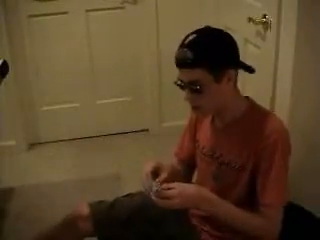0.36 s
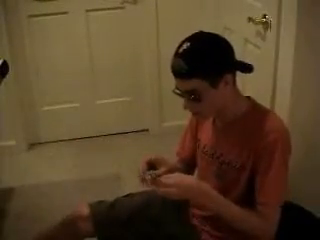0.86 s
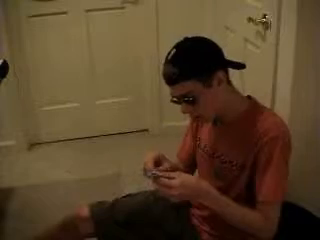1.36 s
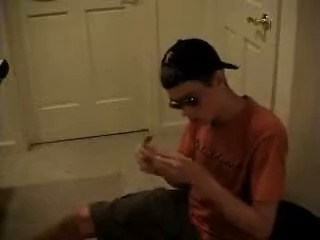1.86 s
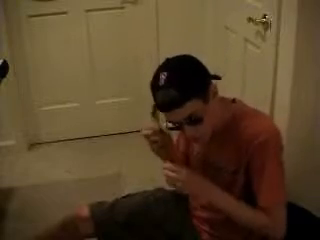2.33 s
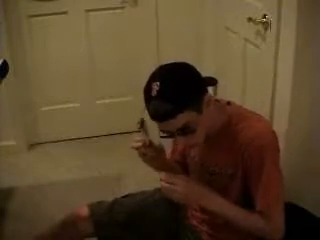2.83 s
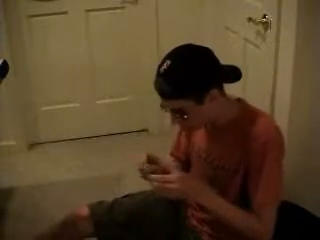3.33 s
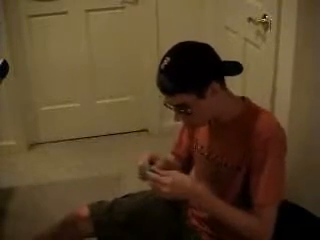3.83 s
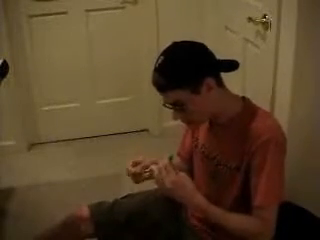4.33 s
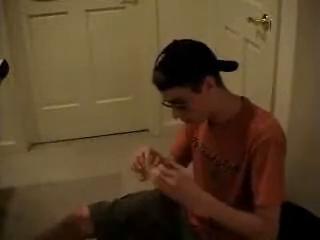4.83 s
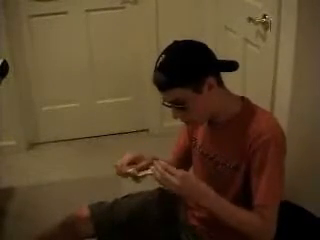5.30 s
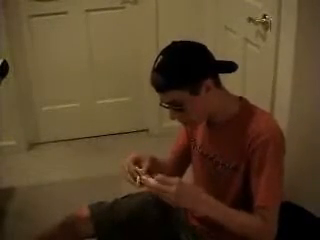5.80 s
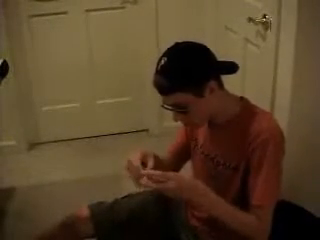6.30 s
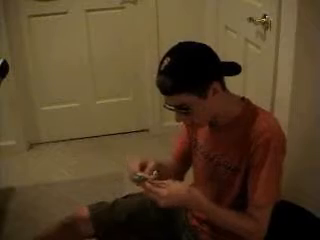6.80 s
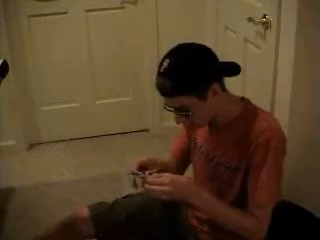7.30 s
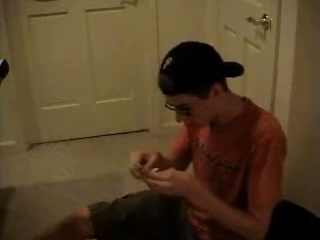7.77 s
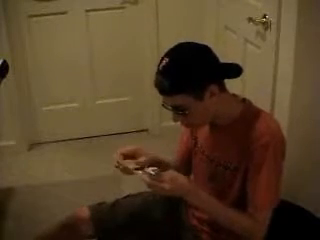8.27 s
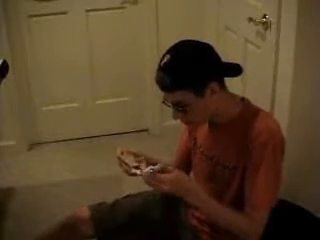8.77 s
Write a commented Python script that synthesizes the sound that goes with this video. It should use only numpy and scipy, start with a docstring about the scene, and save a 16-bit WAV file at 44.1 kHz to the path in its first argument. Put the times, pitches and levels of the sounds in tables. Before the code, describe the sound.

Stiff wrapping paper crinkles and snaps in fidgeting hands, tears in short rips, then gives one very loud crack in a quiet carpeted room.

```python
"""A small parcel worked open by hand

Hands work stiff wrapping in a quiet carpeted room, two metres from a pair of microphones.
Creases buckle with short snaps of filtered noise; rustle and dense rips are trains of damped sines.
Sparse decaying taps give the room its reverberation, and one hard pull overloads the input.
Shaped noise underneath makes a low hum, microphone hiss and one brief rumble."""
import sys
import numpy as np
from scipy import signal
from scipy.fft import rfft, irfft, next_fast_len
from scipy.io import wavfile
from scipy.ndimage import uniform_filter1d

SR = 44100
rng = np.random.default_rng(int(sys.argv[2]) if len(sys.argv) > 2 else 0)


def attenuation_scalar(level_db):
    """Turn a level in dB into a linear amplitude multiplier (20 dB per decade)."""
    decades = np.asarray(level_db, float) / 20
    return 10 ** decades


def wav_record(signal):
    """Record a signal, one row per channel, as 16-bit PCM in the file named by sys.argv[1]."""
    frames = np.transpose(np.atleast_2d(signal))
    bounded = np.clip(frames, -1, 1)
    # unit amplitude maps onto the largest positive 16-bit level
    quanta = np.round(bounded * 32767).astype(np.int16)
    wavfile.write(sys.argv[1], SR, quanta)


N = 392049  # length in samples


def evened(x):
    """Normalises the mean power: scales to rms 1."""
    return x / np.sqrt(np.mean(x ** 2) + 1e-20)


def read(points, hz):
    """Interpolates a spectrum table on a log-frequency axis."""
    f, value = np.transpose(points)
    return np.interp(np.log(hz + 1), np.log(f + 1), value)


def coloured(x, points):
    """Zero-phase filtering: multiplies the spectrum by real gains from a dB table."""
    size = next_fast_len(x.shape[-1])
    gains = attenuation_scalar(read(points, np.fft.rfftfreq(size, 1 / SR)))
    return irfft(rfft(x, size) * gains, size)[..., :x.shape[-1]]


def band(x, lo_hz, hi_hz):
    """Causal resonance: a Butterworth band-pass."""
    return signal.sosfilt(signal.butter(2, [lo_hz, hi_hz], "band", fs=SR, output="sos"), x)


def add(mix, s, sound):
    """Superposition: adds a sound to the mix, in place, from a time in seconds."""
    part = mix[round(s * SR):][:len(sound)]
    part += sound[:len(part)]


def hush():
    """Partly coherent noise: room air and microphone hiss on two sides, with two narrow hums."""
    # relative spectrum of the hiss: f/Hz, level per Hz/dB
    hiss_spectrum = [(15, -34.5), (25, -14.5), (109, -5.5), (160, -7.5), (224, -6.5), (380, -4),
                     (545, -4.5), (630, -1), (1570, -12), (1730, -13), (2740, -15.5), (5500, -20.5),
                     (7350, -26.5), (7900, -58), (10300, -68.5), (17400, -120)]
    # left-right correlation of the hiss: f/Hz, coefficient (-1 to 1)
    coherence = [(60, 0.11), (160, 0.14), (410, -0.41), (1080, -0.54), (2840, -0.042), (7450, -0.43)]
    # wavering hum tones: f/Hz, width/Hz, level/dB
    hums = [(208.7, 13.5, -60), (243.8, 8.6, -61)]
    hiss_db = -48  # rms
    frames, hz = N // 512 + 5, np.fft.rfftfreq(2048, 1 / SR)
    a, b, c, d = rng.standard_normal((4, len(hz), frames))
    same = np.clip(read(coherence, hz), -1, 1)[:, None]
    left = a + 1j * b
    right = same * left + np.sqrt(1 - same ** 2) * (c + 1j * d)
    spectra = np.array([left, right]) * attenuation_scalar(read(hiss_spectrum, hz))[:, None]
    hiss = signal.istft(spectra, nperseg=2048, noverlap=1536)[1][:, :N]
    out = attenuation_scalar(hiss_db) * evened(hiss)
    for tone_hz, width_hz, db in hums:
        noise = rng.standard_normal((2, N))
        out += attenuation_scalar(db) * evened(band(noise, tone_hz - width_hz / 2, tone_hz + width_hz / 2))
    return out


def rumble():
    """Band-limited noise under an envelope: low noise swells, holds and fades once."""
    start_s, rise_s, hold_s, fade_s = 2.16, .05, .29, .12
    corners = start_s + np.cumsum([0, rise_s, hold_s, fade_s])
    level = attenuation_scalar(-60) * np.interp(np.arange(N) / SR, corners, [0, 1, 1, 0])
    return level * evened(band(rng.standard_normal(N), 22, 80))


def room(x):
    """Impulse-response convolution: direct sound, near echoes and sparse taps decaying band by band."""
    # reverberation time: f/Hz, t60/s
    decay = [(300, 0.58), (1000, 0.31), (2500, .35), (5000, 0.33), (8000, 0.3)]
    # reflections from floor, knees and door: delay t/s, left level/dB, right level/dB
    reflections = [(.0045, -14.5, -19), (.0075, -29.5, -15.5), (.011, -26, -23.5), (.016, -15.5, -24)]
    tail_db = -8  # energy of the left reverberant tail relative to the direct sound
    tail_same = 0.39  # left-right likeness of the tail
    taps = np.zeros((2, SR // 2))
    at = np.arange(500, SR // 2 - 20, 20) + rng.integers(0, 20, (2, (SR // 2 - 501) // 20))
    np.put_along_axis(taps, at, rng.choice([-1., 1.], at.shape), 1)
    taps[1] = tail_same * taps[0] + np.sqrt(1 - tail_same ** 2) * taps[1]
    hz, t, z = signal.stft(taps, SR, nperseg=256)
    decayed = z * attenuation_scalar(-60 * t / read(decay, hz)[:, None])
    response = signal.istft(decayed, SR, nperseg=256)[1]
    response *= attenuation_scalar(tail_db) / np.linalg.norm(response[0])
    response[:, 0] += 1  # direct sound
    for s, *side_db in reflections:
        response[:, round(s * SR)] += attenuation_scalar(side_db)
    return signal.oaconvolve(x[None], response, axes=1)[:, :N]


def thumps():
    """Pressure pulse: one slow push and pull of air, alike at both ports."""
    # air pushed as the sheet gives: t/s, scale level/dB (the pulse itself peaks 4.7 dB lower)
    pushes = [(4.451, -35), (5.206, -39), (8.32, -18)]
    out, u = np.zeros(N), np.arange(6000) / SR / .0045
    pulse = (1 - u) * np.exp(-u) * np.minimum(u * 4, 1)
    for s, db in pushes:
        add(out, s, attenuation_scalar(db) * pulse)
    return out


def effort(gestures, resting):
    """Incoherent addition: gestures swell and fade, powers add, and the brightness is the power-weighted mean
    of all gestures and the resting level."""
    resting_bright = .6
    t = np.arange(0, N, 32) / SR
    s, db, swell_s, fade_s, bright = np.transpose(gestures)[..., None]
    power = attenuation_scalar(db - 20 * np.where(t < s, (s - t) / swell_s, (t - s) / fade_s)) ** 2
    rest = resting(t) ** 2 + 1e-20
    total = power.sum(0) + rest
    share = ((power * bright).sum(0) + rest * resting_bright) / total
    return [np.interp(np.arange(N) / SR, t, v) for v in (np.sqrt(total), np.clip(share, 0, 1))]


def crackle(level, bright, per_s, spread_db, cycles, clump_db):
    """Shot noise through resonators: clumped tiny buckles each ring their own patch of paper."""
    # relative spectrum of the loose sheet: f/Hz, level per Hz/dB
    slack_sheet = [(150, -17), (300, -13), (700, -8), (1500, 1.5), (2400, -4.5), (3500, -13), (6000, -7),
                   (7900, -6), (10000, -47)]
    # relative spectrum of the stretched sheet: f/Hz, level per Hz/dB
    taut_sheet = [(150, -33.5), (500, -16.5), (1000, -3), (2400, 0.5), (3400, 0.5), (4600, 0.5),
                  (6500, -10.5), (7900, -20.5), (10000, -45)]
    clumps = attenuation_scalar(clump_db * evened(uniform_filter1d(rng.standard_normal(N), size=400)))
    size = attenuation_scalar(spread_db * np.minimum(rng.exponential(1, N), 4)) * rng.choice([-1., 1.], N)
    size *= clumps * (rng.random(N) < per_s / SR)
    patch, grains = rng.integers(0, 24, N), np.zeros(N)
    for k, hz in enumerate(np.geomspace(250, 9000, num=24)):
        # a damped sine that falls by 1/e in the given cycles; equal energy per Hz across patches
        r, turn = np.exp(-hz / cycles / SR), 2 * np.pi * hz / SR
        feedback = [1, -2 * r * np.cos(turn), r * r]
        grains += signal.lfilter([hz * r * np.sin(turn)], feedback, size * (patch == k))
    slack = evened(coloured(grains, slack_sheet))
    taut = evened(coloured(grains, taut_sheet))
    return level * ((1 - bright) * slack + bright * taut)


def rustle():
    """Sparse shot noise: squeezed paper crackles, and fingers never quite rest."""
    # squeezes of the sheet: peak t/s, level/dB, 20 dB swell t/s, 20 dB fade t/s, brightness (0-1)
    squeezes = [(.239, -52, .06, .2, .6), (.341, -52, .2, .16, .6), (.521, -47, .09, .15, .95),
                (.718, -49, .04, .11, .6), (.994, -46.5, .09, .18, .8), (1.275, -50, .07, .05, .6),
                (1.42, -56, .02, .3, .7), (1.527, -43.5, .17, .075, .95), (1.956, -48, .01, .35, .7),
                (2.548, -51, .1, .6, .6), (2.728, -53, .4, .05, .4), (3.195, -52.5, .1, .05, .7),
                (3.724, -54, .08, .6, .6), (3.893, -43.5, .04, .2, .95), (4.07, -49, .15, .1, .4),
                (4.128, -38, .02, .07, .2), (4.258, -34, .045, .105, .8), (4.815, -37.5, .06, .04, .6),
                (4.947, -45, .19, .125, .4), (6.2, -41, .15, .11, .6), (6.326, -46.5, .03, .3, .8),
                (6.515, -39.5, .2, .13, .7), (6.71, -44, .17, .3, .45), (6.915, -46, .07, .045, .3),
                (6.99, -48, .025, .14, .6), (7.106, -51, .1, .3, .9), (7.21, -46, .06, .25, .7),
                (7.509, -42.5, .3, .07, .6), (7.689, -41.5, .07, .2, .45), (7.792, -33.5, .025, .035, .6),
                (7.836, -24.5, .011, .022, .8), (8.118, -45, .045, .16, .7), (8.215, -42, .055, .14, .95)]
    # restless fingers: t/s, level/dB
    fidget = [(0, -61), (.9, -63), (1.7, -66), (2.3, -66), (2.9, -59), (3.4, -65), (3.7, -60), (4.4, -57),
              (4.62, -60), (4.72, -50), (5.1, -54), (5.75, -51), (5.9, -53.5), (6.1, -51), (7, -61),
              (7.8, -57), (7.93, -48.5), (8.1, -56), (8.52, -48.5), (8.89, -48)]
    grains_per_s = {"rustle": 3000, "rip": 9000}  # buckles per second, by kind of crackle
    fingers = effort(squeezes, lambda t: attenuation_scalar(np.interp(t, *np.transpose(fidget))))
    return crackle(*fingers, grains_per_s["rustle"], spread_db=1.5, cycles=0.71, clump_db=2.5)


def rips():
    """Dense shot noise: fibres part in quick succession along a tear."""
    # tugs: peak t/s, level/dB, 20 dB swell t/s, 20 dB fade t/s, brightness (0-1)
    tugs = [(4.44, -30, .02, .05, .8), (4.458, -18.5, .025, .083, .6), (4.546, -47, .05, .11, .65),
            (5.166, -32.5, .02, .15, .6), (5.207, -19.5, .011, .04, .65), (5.265, -31, .04, .25, .55),
            (5.368, -27.5, .03, .055, .85), (5.41, -35, .03, .2, .7), (5.495, -24.5, .035, .12, .65),
            (5.538, -23, .07, .065, .9), (5.595, -32, .08, .03, .9), (8.284, -27, .006, .1, .75),
            (8.328, -9.5, .035, .06, .35), (8.348, -16, .03, .078, .45)]
    return crackle(*effort(tugs, np.zeros_like), 9000, spread_db=2.0, cycles=1.97, clump_db=1.9)


def snaps():
    """Buckling instability: a crease flips with a wide click, its patch rings, fine crackle follows."""
    # creases: t/s, peak level of the click/dB, ring f/Hz, energy share of the sharp edge/dB,
    # after-crackle level relative to the peak/dB
    creases = [(0.2352, -38.3, 1550, -12.5, -13.2), (0.3416, -34.9, 1700, -7.3, -17.8),
               (0.4835, -37.2, 2970, -4.0, -15.9), (0.5045, -38.0, 3070, -3.1, -30.0),
               (0.512, -35.3, 5090, -2.1, -5.2), (0.5198, -27.9, 1080, -13.2, -19.6),
               (0.5559, -20.9, 1280, -4.7, -21.3), (0.5634, -23.0, 900, -14, -26.5),
               (0.6308, -31.8, 4170, -1.5, -21.8), (0.7071, -23.7, 2250, -7.0, -22.8),
               (0.9789, -32.3, 1750, -11.2, -19.2), (1.267, -39.7, 1290, -18.4, -16.9),
               (1.4071, -42.0, 1400, -6.9, -8.1), (1.4737, -39.7, 1980, -0.7, -30.0),
               (1.5173, -31.4, 3340, -1.6, -12.5), (1.5241, -24.9, 2290, -2.9, -26.0),
               (1.7491, -37.0, 750, -3.8, -17.1), (1.9543, -25.7, 3990, -2.7, -13.0),
               (1.965, -23.0, 2000, -8.3, -27.6), (2.3849, -24.7, 1900, -26, -24.4),
               (2.4593, -32.2, 2260, -15.9, -21.8), (2.4798, -38.4, 2200, -15.8, -29.6),
               (2.51, -28.9, 2170, -16.0, -26.2), (2.5412, -16.6, 2250, -5.1, -27.0),
               (2.5872, -33.5, 1960, -5.6, -21.1), (2.6362, -28.0, 2250, -22.0, -24.0),
               (2.6413, -23.4, 2230, -18, -23.6), (2.663, -34.0, 1430, -18.6, -17.3),
               (2.676, -29.5, 2290, -16.8, -30.0), (2.8229, -29.8, 1600, -16, -23.9),
               (3.1893, -28.7, 2240, -22, -30), (3.3243, -32.7, 2240, -14, -24.7),
               (3.7127, -29.3, 2100, -6.1, -24.4), (3.7797, -23.5, 1300, -3.8, -21.0),
               (3.8409, -28.0, 1600, -4.0, -18.6), (3.8645, -27.9, 2940, -6.2, -20.3),
               (3.8866, -19.8, 2580, -8, -22.7), (3.8991, -25.8, 3560, -1.9, -30.0),
               (3.9281, -20.8, 1380, -7.5, -20.1), (3.9621, -26.8, 2680, -4.7, -25.9),
               (4.007, -34.6, 1290, -7.3, -30.0), (4.0308, -26.6, 2500, -3, -21.4),
               (4.0633, -27.3, 1250, -7.8, -18.9), (4.0811, -31.0, 1490, -6.7, -17.3),
               (4.1197, -21.7, 1700, -7, -21.8), (4.2173, -31.9, 2320, -2.8, -15.5),
               (4.2278, -26.2, 4530, -3.1, -27.3), (4.244, -16.6, 4770, -1.3, -22.4),
               (4.2634, -18.4, 4690, -1.3, -15.3), (4.2953, -26.3, 2320, -2.5, -11.4),
               (4.3026, -20.1, 5780, -0.8, -24.6), (4.3097, -24.5, 1680, -4.1, -18.4),
               (4.4359, -16.4, 2010, -6.9, -16.8), (4.4428, -20.8, 2220, -6.8, -30.0),
               (4.4517, -8.4, 6500, -3.3, -30.0), (4.4663, -14.2, 1440, -5.3, -30.0),
               (4.4739, -13.6, 1490, -5.6, -30.0), (4.7874, -32.0, 2710, -6.9, -15.9),
               (4.8141, -21.3, 3400, -6.0, -21.0), (4.8685, -26.1, 2580, -3.9, -18.4),
               (4.9091, -25.8, 1600, -10.7, -21.7), (4.9369, -30.3, 1790, -11.3, -24.7),
               (5.1457, -39.8, 2200, -9.5, -4.6), (5.158, -25.2, 2560, -2.2, -10.0),
               (5.1679, -20.9, 1570, -7.1, -30.0), (5.1817, -19.3, 1700, -3.8, -30.0),
               (5.2022, -11.3, 3370, -2.4, -18.2), (5.2093, -11.4, 3340, -3.9, -30.0),
               (5.2455, -21.0, 2360, -3.9, -30.0), (5.3685, -16.0, 2430, -5.4, -30.0),
               (5.3943, -22.2, 2500, -8.7, -30.0), (5.4762, -23.6, 1260, -4, -27.0),
               (5.4938, -13.1, 1750, -9.4, -30.0), (5.5243, -12.7, 2940, -6.6, -30.0),
               (5.5346, -9.0, 2340, -2.5, -30.0), (5.5626, -16.0, 4900, -2.6, -30.0),
               (5.601, -19.3, 3060, -3.8, -30.0), (5.9377, -31.6, 850, -27, -16.2),
               (5.947, -30.0, 950, -22, -14.4), (5.9788, -29.8, 1810, -4.0, -28.5),
               (6.0168, -25.9, 4490, -2.5, -27.9), (6.039, -32.8, 5360, -2.1, -24.7),
               (6.0518, -30.9, 1800, -17, -18.0), (6.098, -32.1, 2730, -4.5, -30.0),
               (6.1327, -14.5, 4550, -1, -25.6), (6.1409, -21.1, 4670, -0.9, -30.0),
               (6.1788, -29.4, 1530, -7.2, -10.9), (6.185, -21.2, 2490, -10.5, -24.1),
               (6.202, -26.6, 2680, -16.3, -30.0), (6.3073, -30.9, 3430, -4.4, -11.5),
               (6.3183, -26.1, 1690, -16, -12.1), (6.3308, -25.8, 2630, -0.8, -19.0),
               (6.489, -26.5, 4630, -2.3, -17.9), (6.5145, -19.2, 2860, -1.8, -30.0),
               (6.521, -24.3, 2510, -2.5, -30.0), (6.6617, -27.7, 1600, -18.3, -22.2),
               (6.7209, -24.0, 1210, -5.6, -21.0), (6.8896, -27.1, 1700, -16, -21.1),
               (6.9101, -34.2, 750, -15.6, -30.0), (6.9268, -28.6, 1730, -26.3, -30.0),
               (6.9855, -20.2, 6500, -0.6, -30.0), (7.0936, -27.1, 4940, -1.9, -21.8),
               (7.1966, -31.1, 2250, -3.0, -14.6), (7.2161, -29.1, 4670, -1.3, -16.7),
               (7.3329, -36.1, 2110, -1.1, -18.4), (7.3398, -35.9, 2010, -10.2, -30.0),
               (7.3701, -25.9, 1550, -4.9, -23.7), (7.3965, -26.7, 4290, -1.6, -25.8),
               (7.4191, -21.9, 5100, -3, -20.2), (7.5054, -24.3, 2300, -5.0, -21.9),
               (7.6081, -36.3, 1560, -7.3, -12.8), (7.655, -33.0, 1740, -22.8, -30.0),
               (7.6754, -38.3, 2050, -12.2, -7.9), (7.6868, -21.4, 2550, -4.4, -26.2),
               (7.7089, -27.3, 3100, -4.6, -19.9), (7.7321, -22.4, 2260, -3.6, -23.1),
               (7.786, -18.9, 2900, -6.5, -21.2), (7.7932, -29.1, 2580, -13.7, -30.0),
               (7.824, -18.1, 2270, -3.7, -11.2), (7.8306, -15.8, 1600, -5.5, -30.0),
               (7.8779, -19.3, 4940, -2.0, -17.7), (8.1119, -26.4, 2570, -5.9, -30.0),
               (8.1205, -31.7, 2330, -7.9, -30.0), (8.1395, -30.6, 4590, -1.0, -24.2),
               (8.1556, -24.0, 3050, -3.9, -24.6), (8.2044, -22.5, 1660, -9.2, -15.6),
               (8.2154, -26.7, 1180, -23.7, -16.1), (8.2268, -22.1, 4150, -3.4, -23.8),
               (8.2346, -23.2, 2370, -7.6, -19.5), (8.2848, -19.9, 2200, -1.6, -13.0),
               (8.2957, -12.3, 1810, -4.2, -30.0), (8.3077, -12.4, 1920, -6.2, -30.0),
               (8.3146, -9.5, 2130, -5.1, -30.0), (8.3213, 3.0, 1600, -12, -30),
               (8.3378, -4.0, 2550, -9.2, -30.0), (8.3564, -10.4, 3310, -6, -28.0),
               (8.3742, -2.3, 1870, -6.2, -30.0), (8.3826, -9.7, 2270, -4.3, -30.0),
               (8.5044, -31.4, 1670, -12.2, -22.7), (8.5846, -39.1, 1600, -14.7, -9.9),
               (8.6045, -30.7, 3010, -5.2, -20.3), (8.6833, -25.0, 4270, -1.7, -24.4),
               (8.6913, -31.6, 2000, -18.2, -30.0)]
    flap_hz, middle_hz = 1150, 2300
    paler_db_per_octave, palest_db = 9, -18  # flap and middle fade the further they lie from the ring
    out, t = np.zeros(N), np.arange(2000) / SR
    fade = np.exp(-t / 0.0098) * np.minimum(t / 0.0028, 1)
    fade /= np.sqrt(np.mean(fade[130:620] ** 2))  # unit level 3-14 ms after the click
    s, db, hz, edge_db, after_db = np.transpose(creases)

    a, b = rng.standard_normal((2, len(creases), len(t)))
    kick = 0.21 * a * np.exp(-t / 0.0012) + np.sign(b) * (t == 0)
    both = np.stack([kick, a * b], axis=1)  # click and after-crackle of each crease
    # the ringing patch, heavily damped
    both += 1.2 * np.array([band(v, f / 1.13, f * 1.13) for v, f in zip(both, hz)])

    # low flap, middle and sharp edge, each at unit energy
    parts = np.array([band(both, 538, 2000), band(both, 1600, 3700), band(both, 4000, 6820)])
    parts /= np.linalg.norm(parts, axis=3, keepdims=True)
    octaves = abs(np.log2(hz / np.array([[flap_hz], [middle_hz]])))
    body = attenuation_scalar(np.maximum(-paler_db_per_octave * octaves, palest_db))
    edge = np.minimum(attenuation_scalar(edge_db), .995)
    body *= np.sqrt(1 - edge ** 2) / np.linalg.norm(body, axis=0)
    weights = np.array([*body, edge])[..., None]

    clicks = (weights * parts[:, :, 0]).sum(0)
    afters = (weights ** .87 * parts[:, :, 1]).sum(0)  # a paler copy of the click's colour
    for k, (click, after) in enumerate(zip(clicks, afters)):
        crackling = attenuation_scalar(after_db[k]) * evened(after) * fade
        add(out, s[k], attenuation_scalar(db[k]) * (click / abs(click).max() + crackling))
    return out


def scene():
    """Superposition: paper in the reverberant room over the quiet background."""
    paper = rustle() + rips() + snaps()
    return room(paper) + thumps() + hush() + rumble()


def top_cut(x):
    """Nothing passes above the cut-off."""
    return signal.sosfilt(signal.butter(12, 8050, fs=SR, output="sos"), x)


def record(dry):
    """Linear filtering, then clipping: sides differ in colour, the band is limited, peaks overload."""
    # tilt between the two ports: f/Hz, left minus right level/dB
    tilt = [(200, -0.5), (900, -1), (2500, -3.5), (5000, -2), (7500, 0.5)]
    edge_hz = 7820
    sides = [coloured(side, [(hz, sign * db / 2) for hz, db in tilt]) for side, sign in zip(dry, (1, -1))]
    low_pass = signal.firwin(255, edge_hz, window=("kaiser", 9), fs=SR)
    limited = signal.oaconvolve(np.array(sides), low_pass[None], "same")
    overloaded = np.clip(limited, -1, 1)
    return top_cut(overloaded)


dry = scene()
out = record(dry)
wav_record(out)
```